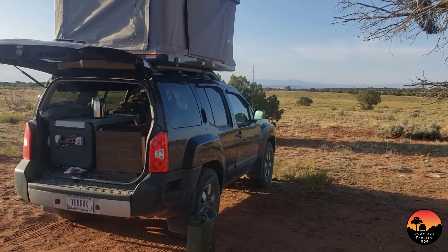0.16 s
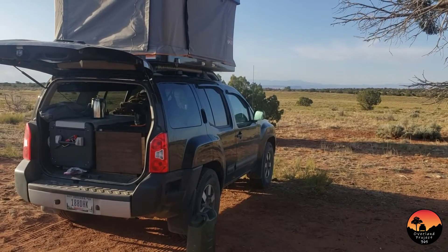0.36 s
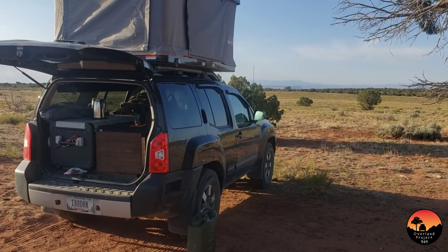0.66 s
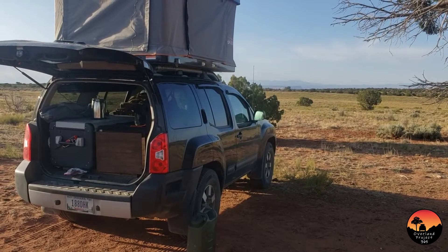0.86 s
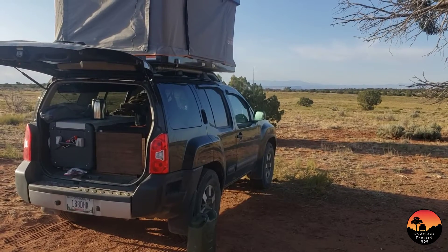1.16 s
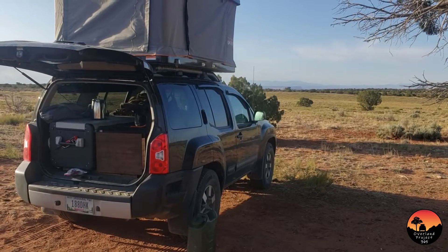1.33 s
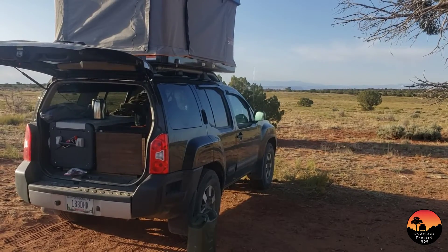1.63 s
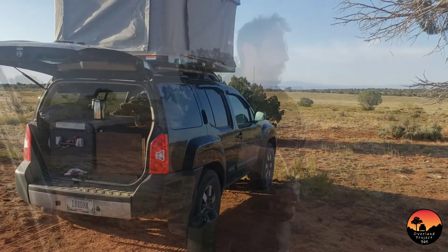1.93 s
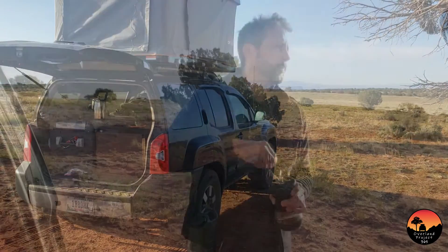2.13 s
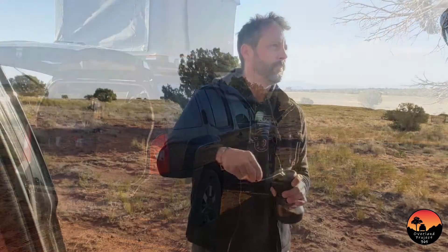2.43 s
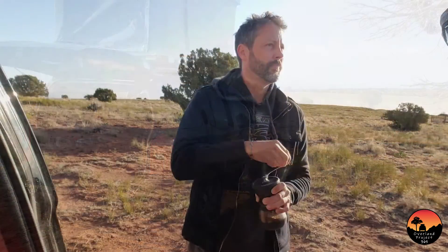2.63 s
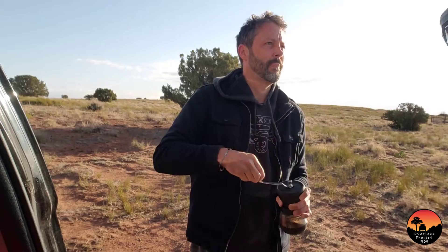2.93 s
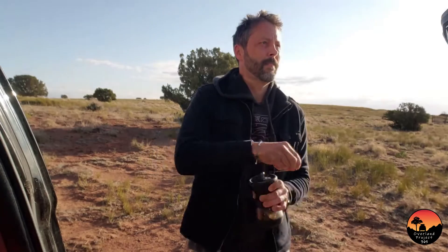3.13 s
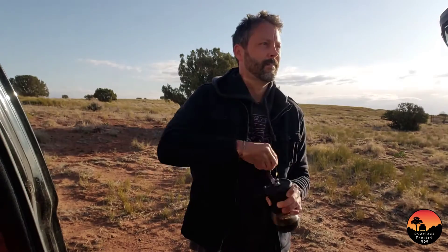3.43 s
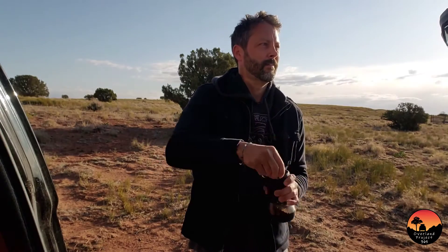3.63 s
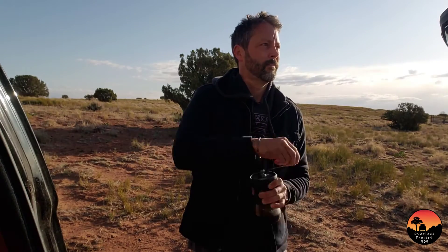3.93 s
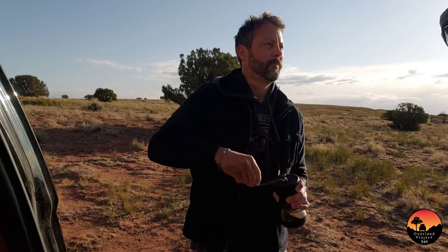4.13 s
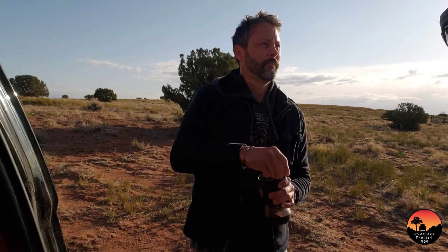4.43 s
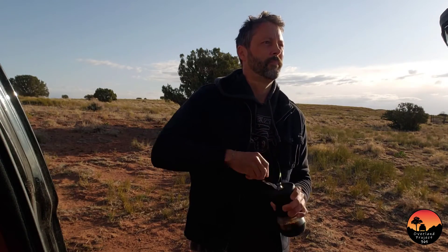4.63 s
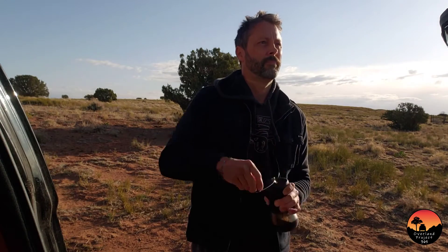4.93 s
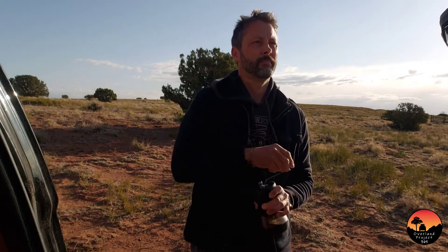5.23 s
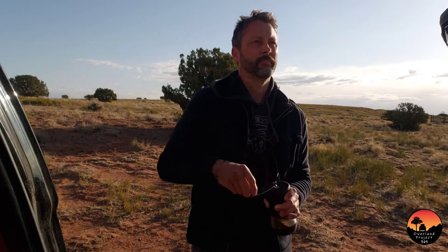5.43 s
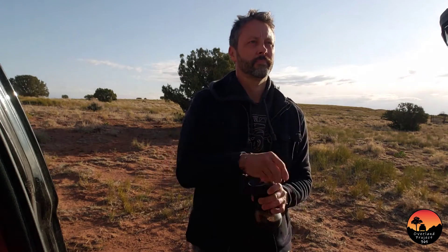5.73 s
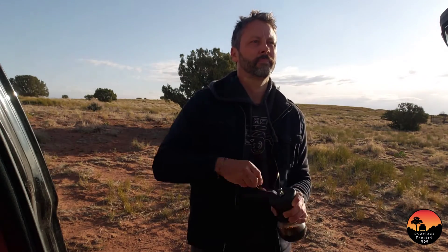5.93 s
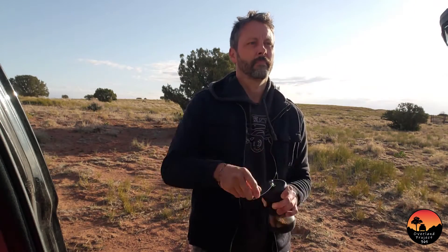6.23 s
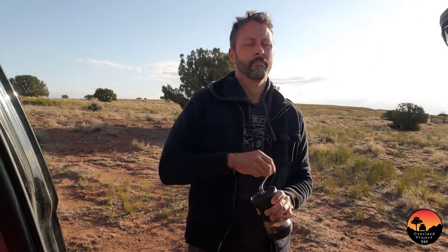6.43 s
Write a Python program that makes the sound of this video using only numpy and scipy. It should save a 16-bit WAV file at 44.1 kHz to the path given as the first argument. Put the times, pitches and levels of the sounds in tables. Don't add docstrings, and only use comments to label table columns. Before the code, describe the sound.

From 0 to about 1.8 s there is only a very quiet, distant low rumble, gently wavering, with faint hiss. Between 1.8 and 2.7 s the place crossfades: the rumble swells and a hand-cranked coffee grinder fades in, starting soft and dull with small chips, then sharper cracks from about 2.4 s. From 2.7 s it is fully present, a couple of metres away: dense gritty crunching with brittle snaps, crumbling bursts and tiny ticks several times a second, unevenly spaced. Each break briefly excites a hollow jar, a mid-pitched shell and sizzling burrs. Effort surges around 3.5 to 3.9 s, eases near 4.5 s, and bites again around 5.1, 5.6 and 6.1 s. Especially hard cracks land near 2.9, 3.9 and 4.7 s. The sound is dry, outdoors and unevenly stereo, with low rumble underneath; grinding continues until an abrupt end around 6.6 s.

```python
import sys
import numpy as np
from scipy import signal
from scipy.fft import rfft, irfft
from scipy.io import wavfile
from scipy.ndimage import uniform_filter1d

SR = 44100
rng = np.random.default_rng(int(sys.argv[2]) if len(sys.argv) > 2 else 0)


def undo_db(level):
    steps = np.asarray(level, float) / 20
    return 10 ** steps


def waveform_to_disk(signal):
    frames = np.transpose(np.atleast_2d(signal))
    scaled = np.clip(frames, -1, 1) * 32767
    samples = np.round(scaled).astype(np.int16)
    wavfile.write(sys.argv[1], SR, samples)


N = 289737
TIME_S = np.arange(N) / SR
FREQ_HZ = np.maximum(np.arange(N // 2 + 1) * SR / N, 1)
GRIND_FADE_S = (1.83, 2.7)
USUAL_SNAP_DB, SNAP_TAIL_DB = -19, -14

# time_s, level_db
RUMBLE_SWELL = [(0.0, -68.5), (0.2, -63), (0.51, -68), (1.21, -76), (1.53, -65.5), (1.81, -72), (2.19, -55),
                (2.58, -48.5), (2.96, -46), (3.4, -46.5), (3.6, -47), (4.04, -46.5), (4.26, -47.5),
                (4.4, -47), (5.4, -49), (5.8, -45.5), (6.07, -51), (6.57, -49)]
# pitch_hz, level_db (per Hz)
FAR_TONE = [(12, -72), (20, -34.5), (59, -1.5), (80, -3), (97, -7.5), (177, 0), (222, -11), (295, -3),
            (341, -10.5), (381, -22.5), (433, -18), (507, -27), (900, -47), (1170, -69), (1980, -120)]
# pitch_hz, level_db (per Hz)
NEAR_TONE = [(12, -60), (20, -44), (64, -10), (107, -9), (167, -0.5), (201, -3.5), (241, -18.5), (307, -9),
             (426, -10), (506, -21), (600, -13.5), (780, -16), (1320, -120)]
# pitch_hz, level_db (per Hz)
HISS_TONE = [(350, -2), (600, -3), (948, -7.5), (4540, -12.5), (7180, -20), (9090, -19.5), (11500, -7),
             (14800, -6.5), (15800, -7), (16500, -20.5)]
# pitch_hz, shared_part (0 to 1)
PORT_LIKENESS = [(200, .95), (700, .65), (1100, .45), (2100, .7), (3500, .55), (4600, .25), (5900, .5),
                 (7000, .2), (9000, .4), (15000, .45)]
# pitch_hz, left_minus_right_db
PORT_BALANCE = [(60, -9), (200, -2.5), (850, -4), (1400, -3), (1900, 10), (2400, -1.5), (3700, 7.5),
                (4200, 0.5), (5500, 1), (7100, -12.5), (9300, -1.5), (11500, -3), (12400, -9.5),
                (14000, -0.5)]
# pitch_hz, lead_radians
PORT_LEAD = [(50, 0), (860, -1.3), (1050, 1), (1550, 2), (2100, -.3), (2700, .4), (3500, 1.6), (4200, .8),
             (5200, 0), (6300, 1.5), (7300, -1.2), (8200, 0), (12500, -.7), (14500, 0)]
# time_s, crunch_db (effort), burr_db (sizzle, how tight the burrs bite)
CRANK_EFFORT = [(1.83, -68, -14), (2.16, -50.5, -2), (2.47, -48.5, -6), (2.85, -47, -8.5),
                (3.06, -48.5, -8.5), (3.48, -40.5, -6), (3.62, -46, -6), (3.79, -39.5, -8.5),
                (3.93, -43.5, -7), (4.28, -47, -5.5), (4.55, -49, -8.5), (4.8, -47.5, -8.5),
                (5.14, -42.5, -3), (5.41, -46.5, -10.5), (5.62, -41, -3.5), (5.8, -44, -8),
                (6.1, -39.5, -0.5), (6.3, -47, -5.5)]
# pitch_hz, width_hz, level_db
BODY_MODES = [(667, 75, -1.5), (792.4, 96, -1.5), (856, 135, 0), (1128, 213, -7.5), (1409, 188, -6),
              (1707, 317, -8.5), (1970, 147, -9), (2170, 220, -3.5), (2595, 347, -7.5), (3038, 305, -13.5),
              (3406, 213, -6), (3762, 307, -9.5), (4460, 745, -10.5), (5320, 590, -21), (5896, 450, -15),
              (6665, 830, -17), (10380, 3900, -24.5), (11550, 800, -12), (12470, 430, -12),
              (13860, 1100, -22.5), (15150, 630, -22)]
# start_s, peak_db, struck_hz (shell pitch struck hardest), burr_db (sizzle)
SNAPS = [(2.0667, -44, 2680, -10), (2.1362, -29, 2580, -8), (2.41, -31, 2230, -11),
         (2.44, -18.5, 3600, -20), (2.7692, -23.5, 2110, -13), (2.9098, -18.5, 2550, -9.5),
         (3.0524, -22.5, 2590, -5.5), (3.116, -32, 2020, -29), (3.2286, -27, 2140, -19),
         (3.3117, -25, 1940, -4), (3.5336, -26.5, 2100, -5), (3.6527, -20.5, 1890, -23),
         (3.7633, -30, 3520, -21), (3.9012, -16, 1430, -11.5), (3.9959, -19, 2040, -13),
         (4.2877, -30, 2310, -11), (4.4054, -34.5, 2170, -11), (4.564, -31, 2270, -20),
         (4.585, -23, 2180, -9), (4.67, -26.5, 2190, -10), (4.7421, -14.5, 2480, -10),
         (4.9632, -28.5, 3470, -9), (5.3467, -26.5, 1700, -15), (5.433, -28, 3830, -19),
         (5.5739, -23.5, 1970, -9), (5.7282, -23.5, 2170, -26), (6.009, -31, 2620, -18),
         (6.1416, -24, 1680, -14.5), (6.39, -32, 3340, -5), (6.539, -21.5, 2200, -13)]
# start_s, peak_db, jar_db, burr_db (sizzle)
CRUMBLES = [(2.0028, -38.5, -4, -14), (2.18, -34, -11, -11), (2.2728, -32, -7.5, -20),
            (2.3231, -35, -1.5, -8.5), (2.481, -22.5, -10.5, -7), (2.63, -34, -24, -10),
            (2.7377, -30, -3, -21), (2.9494, -25.5, -29, -11), (3.029, -29, -25, -21),
            (3.2568, -27.5, -3, -20), (3.3664, -24, -36, -6.5), (3.482, -22, -14, -6),
            (3.6307, -27.5, -21, -13), (3.725, -22.5, -11, -17), (3.817, -20, -17, -12),
            (4.0646, -35, -3, -31), (4.1318, -21, -11.5, -15.5), (4.1859, -25.5, -26, -12),
            (4.362, -18, -8, -18), (4.507, -22, -6, -12), (4.7013, -20.5, -29, -11.5),
            (5.01, -21.5, -25, -13), (5.1385, -19, -12, -6.5), (5.172, -24, -14, -10),
            (5.2163, -23, -38, -10), (5.654, -27.5, -22, -16), (5.7, -25, -9, -8), (5.9357, -28, -13, -12),
            (6.1055, -26, -9.5, -9), (6.4412, -25, -25, -11)]
# start_s, peak_db, tail_db (splinters)
CHIPS = [(1.8412, -82, -12), (1.8751, -55, -3), (1.946, -54, -18.5), (2.2269, -39, -2),
         (2.5357, -33.5, -1.5), (2.612, -33, 0), (2.999, -30, -2), (3.1397, -32.5, -3), (3.4377, -33.5, 3),
         (3.5796, -26, -12), (3.8023, -29, -9), (3.9237, -31, -20), (3.9597, -29, -9), (4.0427, -30, -3.5),
         (4.3373, -26, -4), (4.45, -35, -6), (4.595, -26, -24), (4.63, -30, -8), (4.7885, -41, 6),
         (4.8256, -26.5, -4.5), (4.8968, -26, -7.5), (5.084, -36, -2.5), (5.26, -24.5, -4),
         (5.7883, -25, -3), (5.8873, -23.5, -9), (6.0342, -31.5, -6), (6.168, -33, -2),
         (6.208, -24.5, -8.5), (6.352, -24.5, -9), (6.5241, -27, -1.5)]


def over_hz(table):
    hz, value = np.transpose(table)
    return np.interp(np.log(FREQ_HZ), np.log(np.maximum(hz, 1)), value)


def unit(x):
    return x / np.sqrt(np.mean(x ** 2))


def walk(rate):
    step = int(SR / rate)
    levels = np.repeat(rng.standard_normal(N // step + 1), step)
    return 1.3 * uniform_filter1d(uniform_filter1d(levels, step), step)[:N]


def coloured(table, rows):
    spectrum = rfft(rng.standard_normal((rows, N)))
    return unit(irfft(spectrum * undo_db(over_hz(table)), N))


def ports(paths, likeness, balance_db, lead):
    common, *own = rfft(paths)
    likeness = np.clip(likeness, 0, 1)
    turn = undo_db(balance_db / 2) * np.exp(.5j * lead)
    heard = []
    for private, port_turn in zip(own, (turn, 1 / turn)):
        blend = np.sqrt(likeness) * common + np.sqrt(1 - likeness) * private
        heard.append(blend * port_turn)
    return irfft(heard, N)


def rumble():
    db = np.interp(TIME_S, *np.transpose(RUMBLE_SWELL))
    mix = np.interp(TIME_S, (1.67, 2.21), [0, 1])
    far_likeness = np.interp(FREQ_HZ, [300, 700], [.88, .2])
    near_likeness = np.interp(FREQ_HZ, [150, 500], [.97, .75])
    far = ports(coloured(FAR_TONE, 3), far_likeness, -3.2, 0)
    near = ports(coloured(NEAR_TONE, 3), near_likeness, over_hz(PORT_BALANCE), 0.74 * over_hz(PORT_LEAD))
    roar = np.sqrt(1 - mix) * undo_db(1.5) * far + np.sqrt(mix) * undo_db(2.0) * near

    upper = irfft(rfft(roar) * np.interp(FREQ_HZ, [210, 250], [0, 1]), N)
    upper_db = np.interp(TIME_S, (0.76, 1.6, 1.15), (-10, -2, -7))
    upper_db = upper_db + 0.73 * (TIME_S > GRIND_FADE_S[1]) * (-47 - db)
    swell = undo_db(db + 1.03 * walk(20))
    throb = undo_db(1.0 * walk(8))
    return swell * (throb * (roar - upper) + undo_db(upper_db + 6.0) * upper)


def hiss():
    return undo_db(-80.5 + 4.0) * coloured(HISS_TONE, 2)


def ring(x, hz, width):
    edges = [hz - width / 2, hz + width / 2]
    return signal.sosfilt(signal.butter(2, edges, "bandpass", fs=SR, output="sos"), x)


def burst(at, size, tail_s, rise_s):
    hits = np.bincount(np.minimum(at, N - 1), size, N)
    fall, rise = np.exp(-1 / (tail_s * SR)), np.exp(-1 / (rise_s * SR))
    return signal.lfilter([1 - rise], np.convolve([1, -fall], [1, -rise]), hits)


def grit_grains(per_s=1100, spread_db=4.0):
    s, db, burr_db = np.transpose(CRANK_EFFORT)
    even_crunch_db = np.interp(s, GRIND_FADE_S, (-64, -42.5))
    jar_db = 0.58 * (even_crunch_db - db)
    slots_per_s = 6000
    chance = rng.random((int(slots_per_s * N / SR), 3))
    at = (np.linspace(0, N - 41, len(chance)) + 40 * chance[:, 0]).astype(int)
    clump_db = 1.6 * walk(80)[at]
    effort_db = np.interp(TIME_S[at], s, db, left=-140)
    size_db = -spread_db * np.log(chance[:, 2] + 0.022) + clump_db + effort_db
    size_db = np.where(chance[:, 1] < per_s / slots_per_s, size_db, -200)
    jar = size_db + np.interp(TIME_S[at], s, jar_db) - 0.5
    burrs = size_db + np.interp(TIME_S[at], s, burr_db) + 3.5
    return at, [jar, size_db, burrs]


def beans():
    breaks = []
    for s, db, hz, burr_db in SNAPS:
        jar_db = -14.5 + .5 * (db - USUAL_SNAP_DB)
        breaks.append((s, db, jar_db, burr_db, hz, SNAP_TAIL_DB))
    for s, db, jar_db, burr_db in CRUMBLES:
        breaks.append((s, db, jar_db, burr_db, 1990, -5.5))
    for s, db, tail_db in CHIPS:
        breaks.append((s, db, -13.5, -11.5, 2200, tail_db))
    return np.transpose(breaks)


def ticks():
    s, db, *_, tail_db = beans()
    size = undo_db(db + 11.0 - 0.56 * (tail_db - SNAP_TAIL_DB))
    push = np.bincount((s * SR).astype(int) + 20, size, N)
    hz, width_hz = 1900, 2600
    return ring(ring(push, hz, width_hz), hz, width_hz)


def cracks(hz, part, splinters, stutter):
    s, db, jar_db, burr_db, struck_hz, tail_db = beans()
    at = (s * SR).astype(int)
    struck_db = -6.0 * np.minimum(np.abs(np.log2(hz / struck_hz)), 1.2)
    part_db = [jar_db + 11.5, struck_db + 5.5, burr_db + 12.5][part]
    size = undo_db(db + part_db + 3.0 * rng.standard_normal(len(s)))
    strain = burst(N - 1 - at, size * undo_db(tail_db - 9.0), 0.0063, 0.00036)[::-1]
    tail = burst(at, size * undo_db(tail_db), 0.015, 0.004)
    shower = burst(at, size, 0.0014, 0.00025) + stutter * (tail + strain)
    snap = undo_db(10) * np.bincount(at, size, N)
    return undo_db(-1.0) * (splinters * shower + snap)


def grinder():
    splinters = rng.standard_normal((3, N))
    stutter = undo_db(3.5 * walk(350) - 1.5)
    at, part_db = grit_grains()
    out = np.tile(ticks(), (3, 1))
    for k, (hz, width, db) in enumerate(BODY_MODES):
        part = int(hz > 1200) + int(hz > 8000)
        own_db = 3.0 * rng.standard_normal(len(at)) + 3.5 * walk(25)[at]
        own_db += -3.5 * max(np.log2(hz / 2500), 0) * np.interp(TIME_S[at], GRIND_FADE_S, [1, 0])
        grit = undo_db(-2.0) * burst(at, undo_db(part_db[part] + own_db), 0.0014, 0.00019)
        shake = splinters * grit + cracks(hz, part, splinters, stutter)
        out += (-1) ** k * undo_db(db) * ring(shake, hz, width)
    out[:, -400:] *= np.linspace(1, 0, 400)
    return ports(out, over_hz(PORT_LIKENESS), over_hz(PORT_BALANCE), over_hz(PORT_LEAD))


def scene():
    return rumble() + hiss() + grinder()


def low_pass(x):
    return signal.sosfilt(signal.butter(12, 16840, fs=SR, output="sos"), x)


def record(dry):
    top_cut = signal.ellip(12, .2, 70, 15850, fs=SR, output="sos")
    mix = signal.sosfilt(top_cut, dry)
    return low_pass(mix)


dry = scene()
out = record(dry)
waveform_to_disk(out)
```